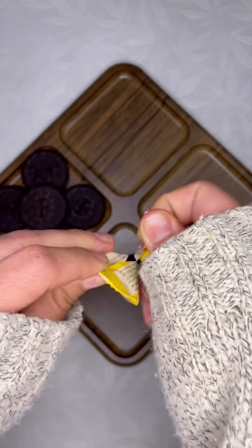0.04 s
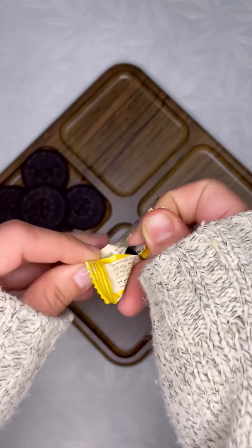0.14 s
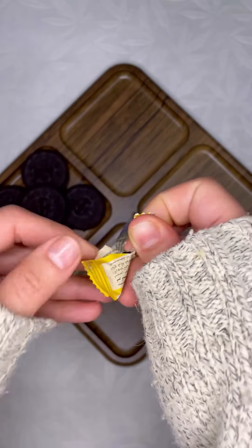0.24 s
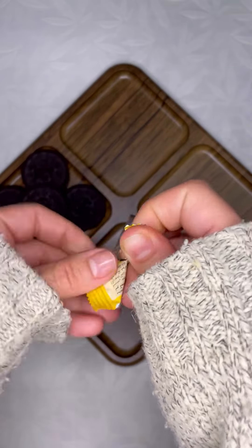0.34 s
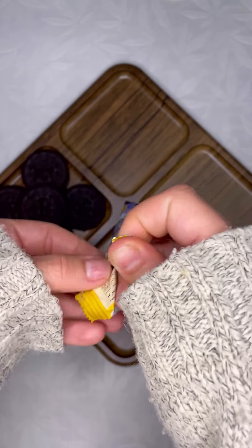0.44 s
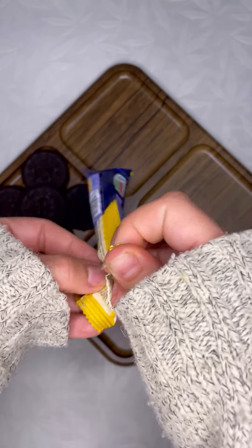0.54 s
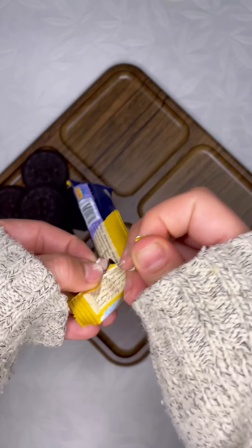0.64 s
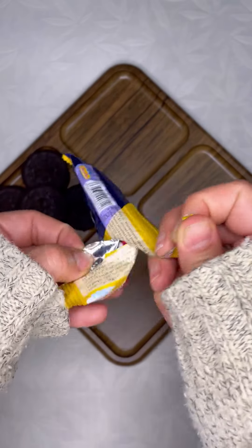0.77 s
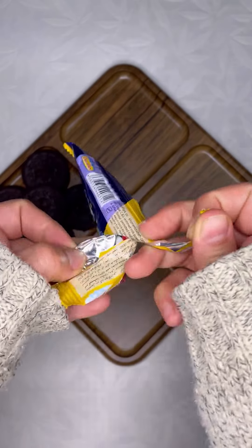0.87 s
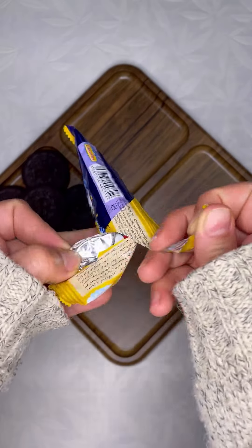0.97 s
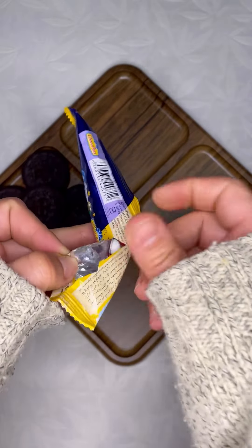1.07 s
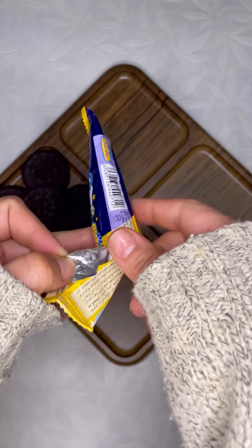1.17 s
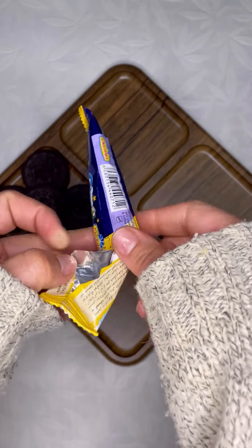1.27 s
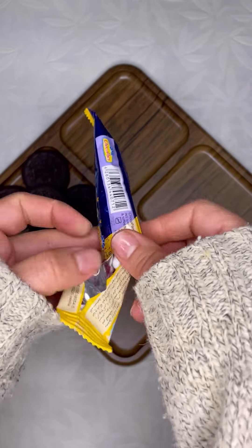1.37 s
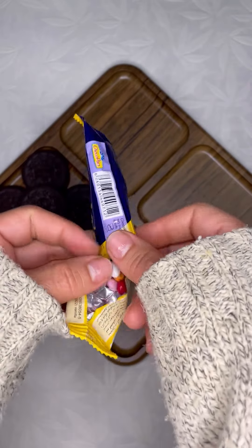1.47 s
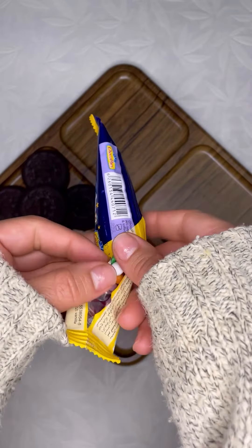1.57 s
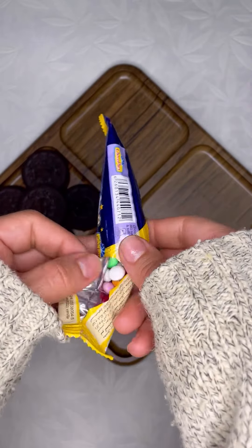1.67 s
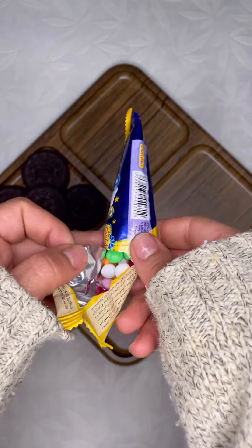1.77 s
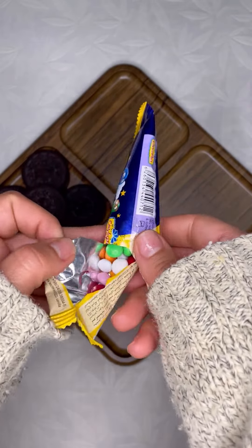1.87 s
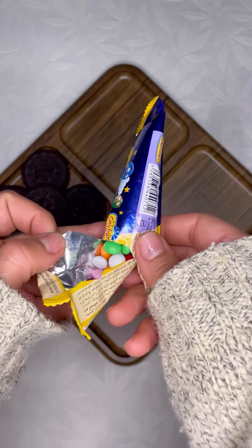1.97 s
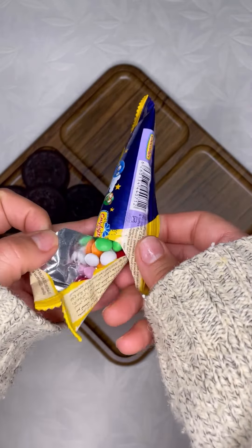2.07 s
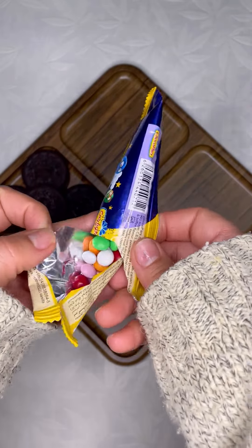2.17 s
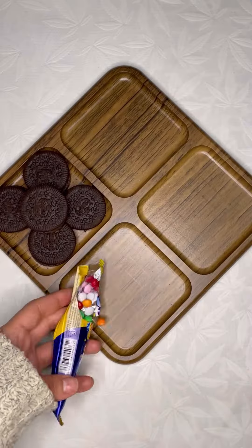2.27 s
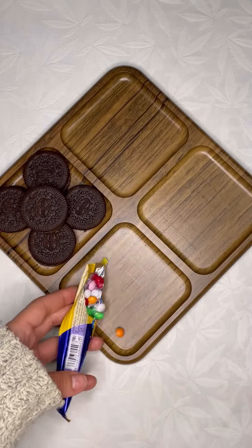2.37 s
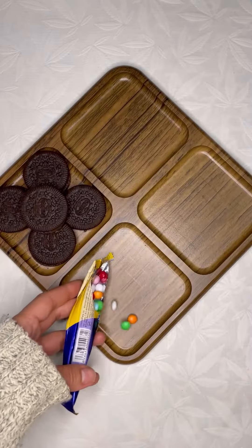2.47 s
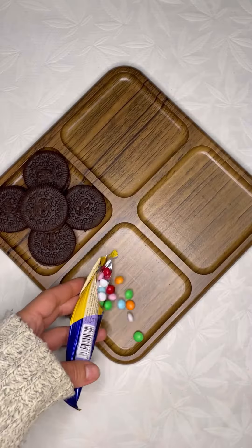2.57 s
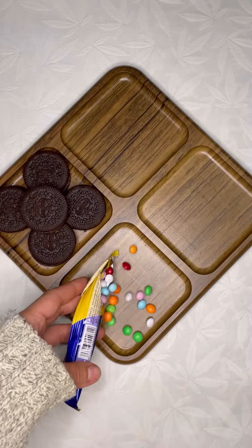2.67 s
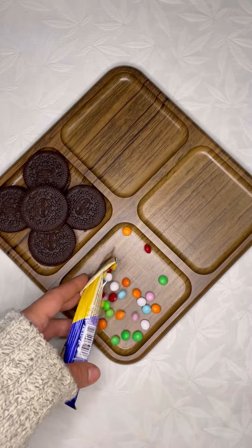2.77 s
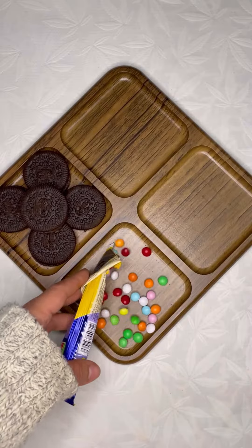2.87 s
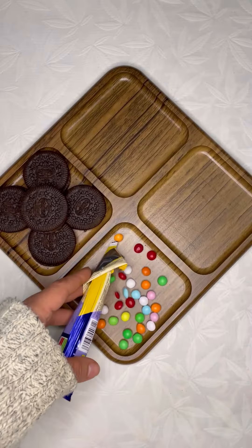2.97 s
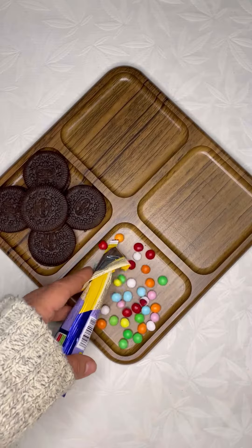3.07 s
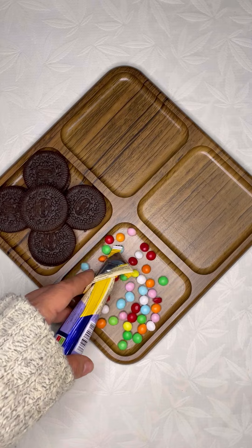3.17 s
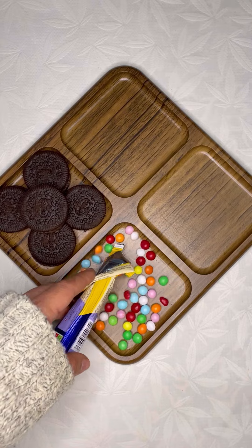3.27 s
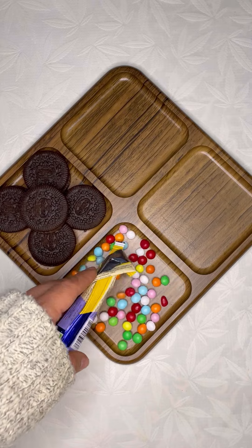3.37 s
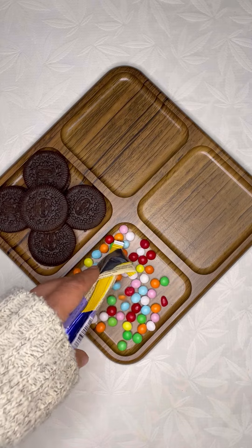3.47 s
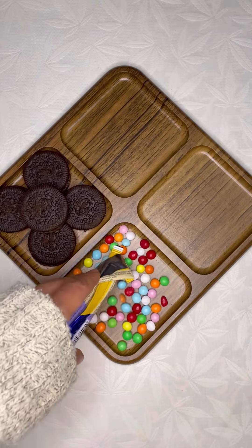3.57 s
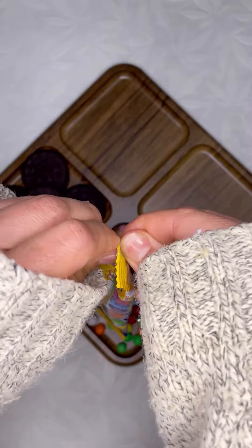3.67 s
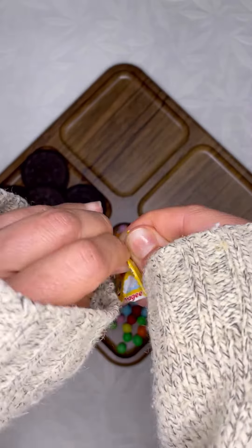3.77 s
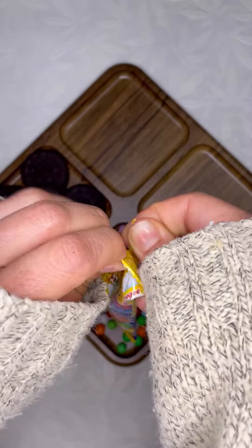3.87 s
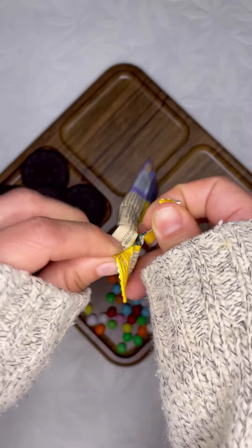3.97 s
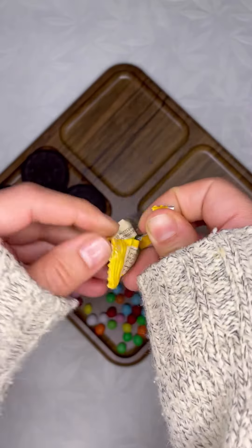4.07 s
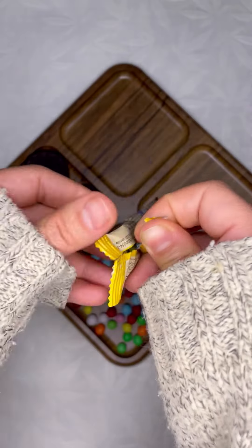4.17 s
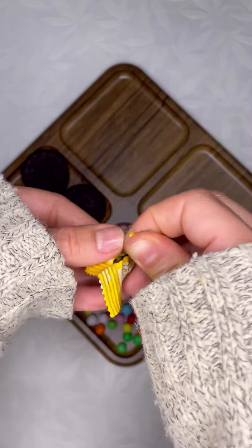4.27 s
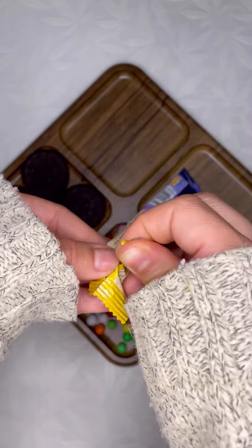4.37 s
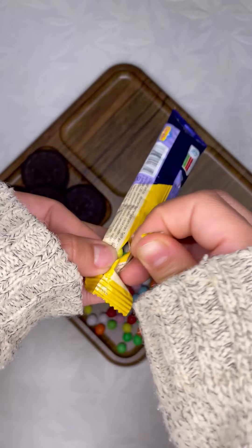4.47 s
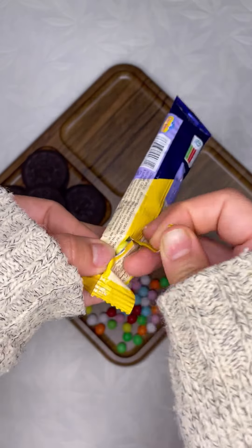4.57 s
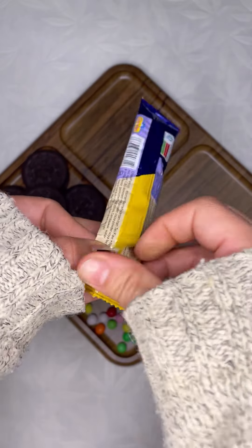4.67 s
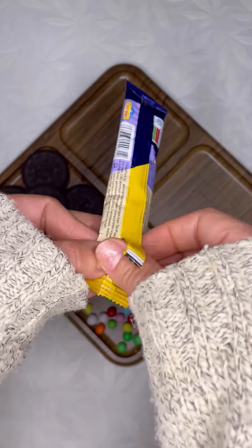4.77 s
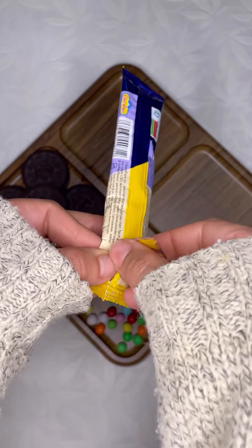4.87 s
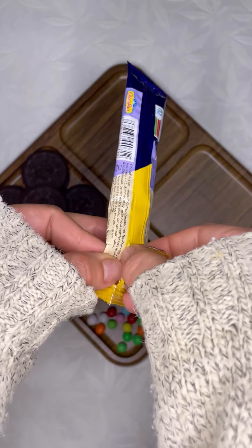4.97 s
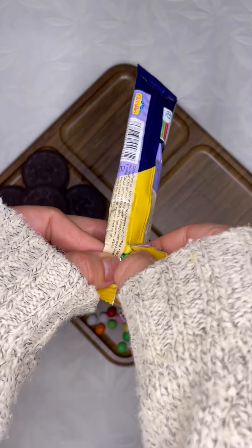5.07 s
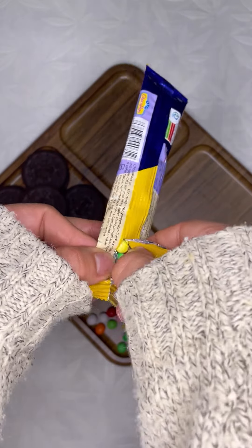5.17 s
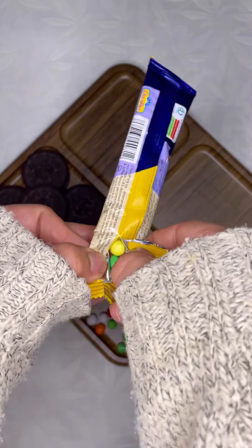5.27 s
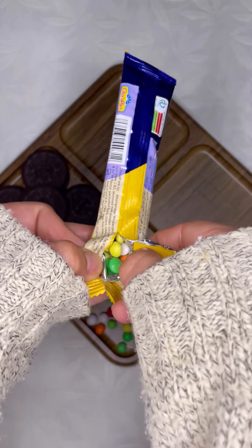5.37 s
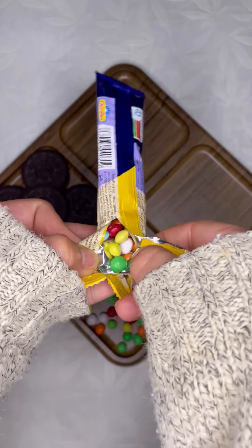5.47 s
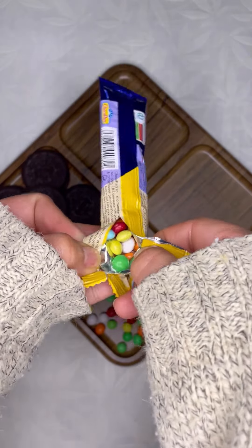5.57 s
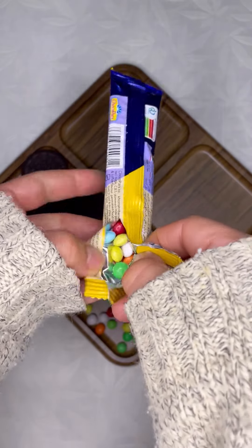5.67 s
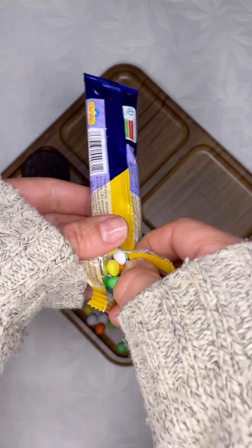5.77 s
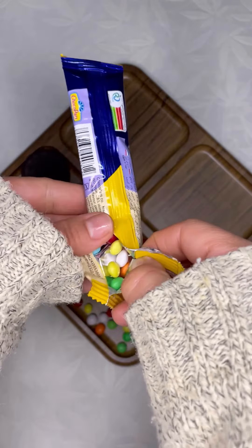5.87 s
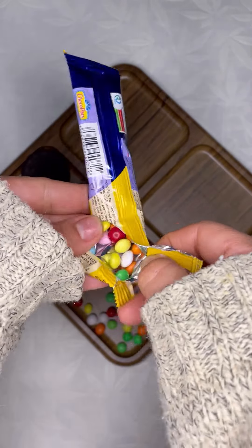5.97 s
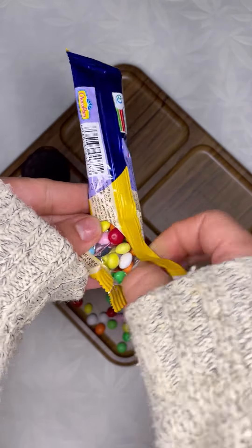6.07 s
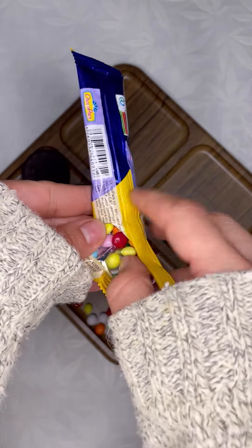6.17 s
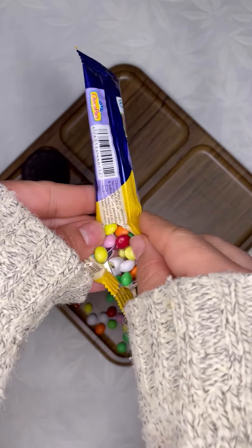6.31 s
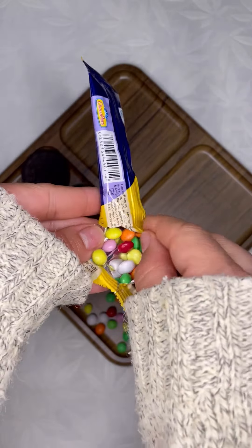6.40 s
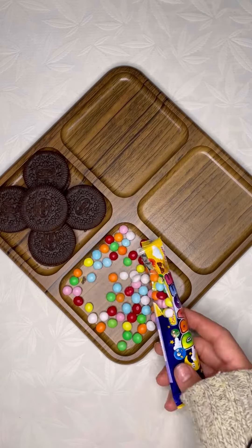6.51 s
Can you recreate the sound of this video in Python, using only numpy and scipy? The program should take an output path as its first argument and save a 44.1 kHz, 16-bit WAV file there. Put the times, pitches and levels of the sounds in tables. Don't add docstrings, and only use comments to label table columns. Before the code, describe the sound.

Close, dry phone pickup in a quiet indoor room with faint low rumble and drifting motor hum. From 0 to 2.25 s fingers tear a foil sweet packet: sharp irregular snaps, tiny ticks and short rips over fine rustling, strongest around 0.75 s, then looser crinkles as the mouth is spread. The sound cuts abruptly at about 2.26 s. A first bead clicks at 2.3 s, a trickle begins near 2.43 s, and by 2.65 to 3.4 s hard sugar-coated sweets rattle densely on a wooden tray, bright and woody, thinning to scattered ticks by 3.63 s. Another cut at 3.65 s brings the second packet: busy crisp crackling and rips until about 4.5 s, separate strong snaps near 4.8 and 5.1 s, then lighter folding, with a dull rustling swell around 6.1 s. After a final cut at 6.48 s, one bead clicks at 6.53 s.

```python
import sys
import numpy as np
from scipy import signal
from scipy.fft import rfft, irfft
from scipy.io import wavfile

SR = 44100
rng = np.random.default_rng(int(sys.argv[2]) if len(sys.argv) > 2 else 0)


def wav_out(sig):
    wavfile.write(sys.argv[1], SR, np.round(np.clip(np.atleast_2d(sig).T, -1, 1) * 32767).astype(np.int16))


def voltage_ratio(level):
    return 10 ** (np.asarray(level, float) / 20)


N = 288414
GRAIN, LEAD = 2048, 64

# t/s, energy level/dB, ring f/Hz, relative low-part level/dB
TEAR_SNAPS = [(0.0044, -14, 3270, -45), (0.0078, -10, 6270, -6), (0.0773, -20, 1890, 27),
              (0.0815, -14.5, 7350, -35), (0.1177, -18, 9600, -44), (0.1478, -6, 10200, -83),
              (0.2146, -8, 15700, -33), (0.226, -11.5, 6960, -27), (0.3037, -18, 12000, -21),
              (0.3415, -7, 9600, -23), (0.3445, -16, 3400, -28), (0.3497, -14, 9550, -16),
              (0.3552, -8.5, 3470, -19), (0.3826, -19, 2900, -16), (0.4358, -27.5, 2860, -14),
              (0.4697, -17.5, 13100, -44), (0.5368, -13, 9500, -12.5), (0.6173, -11, 11500, -26),
              (0.6364, -21, 5800, 2), (0.66, -15, 6540, -46), (0.673, -8, 9300, -25),
              (0.6865, -8, 9500, -14), (0.6967, -9.5, 7640, -48), (0.706, -12.5, 9600, -8),
              (0.7108, -22, 9400, 5), (0.7496, -13, 5460, -7), (0.7714, 5, 14500, -22),
              (0.7797, -3, 7340, -16), (0.7858, -5, 5200, -19.5)]
# t/s, energy level/dB, ring f/Hz, relative low-part level/dB
SPREAD_SNAPS = [(0.881, -28, 5230, -12), (0.949, -20, 14500, -20), (0.9578, -13.5, 2480, -5),
                (1.0135, -21.5, 3150, -18), (1.0895, -15, 2730, -8), (1.0957, -13.5, 9250, -7),
                (1.1132, -21, 14800, -8), (1.1431, -9, 8600, -7), (1.1724, -16, 4050, -11),
                (1.1757, -13, 4230, -3), (1.2077, -24.5, 1900, 8), (1.222, -11.5, 3860, -20),
                (1.2978, -11, 12500, -19), (1.3547, -16, 6200, -9), (1.3597, -7, 7140, -20),
                (1.4513, -16, 13900, -22), (1.4968, -13, 1680, 4), (1.52, -8.5, 8250, -14),
                (1.546, -21, 8500, -7), (1.5961, -12.5, 3470, -18), (1.6022, -12.5, 5650, -15),
                (1.7597, -18, 1970, -18), (1.777, -15, 12600, -9), (1.8144, -19.5, 11900, -9),
                (1.823, -18, 5540, -5), (1.827, -12.5, 5950, -19), (1.9008, -21, 4150, -17),
                (1.9474, -18.5, 6400, 1.5), (2.0536, -8.5, 8800, -23), (2.1508, -17, 5170, -9)]
# t/s, energy level/dB, ring f/Hz, relative low-part level/dB
RETEAR_SNAPS = [(3.6757, -19.5, 3300, -30), (3.7501, -10, 8900, -17), (3.794, -13.5, 2800, -17),
                (3.838, -4, 14100, -27), (3.8719, -11, 9900, -13), (3.877, -17, 10000, -36),
                (3.889, -16, 8350, -30), (3.9302, -8.5, 14500, -23), (3.9384, -10.5, 12300, -18),
                (3.9519, -12, 7850, -11), (3.958, -17, 3070, -27), (3.9848, -13, 11100, -17),
                (4.055, -23, 3360, -6), (4.062, -15, 10000, -10), (4.065, -14, 6900, -20),
                (4.0754, -9.5, 2900, -7), (4.098, -10.5, 9600, -36), (4.1072, -16, 3650, -52),
                (4.174, -21.5, 5460, -28), (4.2524, -13, 9200, -29), (4.264, -13.5, 3850, -72),
                (4.279, -17.5, 13000, -39), (4.3277, -14, 14800, -36), (4.3607, -19, 8100, -41),
                (4.379, -5, 16800, -39), (4.427, -18, 13900, -35), (4.441, -9.5, 13500, -35),
                (4.4459, -7.5, 7400, -39), (4.4545, -14, 4140, -10)]
# t/s, energy level/dB, ring f/Hz, relative low-part level/dB
PULL_SNAPS = [(4.6181, -19, 7200, -9), (4.621, -19.5, 7300, 4), (4.6344, -13, 7800, -22),
              (4.644, -19, 6800, 0), (4.648, -13.5, 3360, -24), (4.6531, -15, 5470, -11),
              (4.7009, -14.5, 8100, -15), (4.7345, -16, 8900, -10), (4.7624, -15, 6850, -4),
              (4.7992, -1.5, 7800, -30), (5.011, -20, 7300, -26), (5.0365, -24.5, 3740, -7),
              (5.055, -28, 2900, -3), (5.1056, 1.5, 8340, -98), (5.112, -13, 9600, -45),
              (5.1369, -8.5, 12500, -37), (5.255, -12.5, 12500, -27.5), (5.2719, -24, 8950, -28),
              (5.317, -31, 15100, -28), (5.409, -8.5, 8500, -13), (5.438, -6.5, 13900, -21),
              (5.4525, -8.5, 14500, -13)]
# t/s, energy level/dB, ring f/Hz, relative low-part level/dB
FOLD_SNAPS = [(5.5192, -30, 6870, -44), (5.5723, -14.5, 3940, -15.5), (5.613, -23, 4050, -1),
              (5.7007, -30, 2020, -11), (5.7124, -11, 11600, -25), (5.734, -13, 12200, -60),
              (5.809, -23, 7400, -5), (5.8766, -17.5, 3620, -56), (5.9176, -8, 14200, -27),
              (5.9866, -6, 6040, -21), (5.957, -29, 9650, -38), (5.996, -23, 10000, -29),
              (6.012, -33, 3000, 4), (6.0483, -15, 10200, -14), (6.101, -7.5, 13800, -18),
              (6.116, -16.5, 1800, 22), (6.1204, -18, 10300, -3), (6.176, -27, 9600, -10),
              (6.185, -28, 7100, -4), (6.224, -25, 7900, -4), (6.257, -16.5, 13100, -25),
              (6.331, -19, 13000, -55), (6.3564, -19, 7160, -10), (6.3668, -15.5, 12900, -36),
              (6.3785, -14.5, 3420, -12.5), ]
SNAPS = np.vstack([TEAR_SNAPS, SPREAD_SNAPS, RETEAR_SNAPS, PULL_SNAPS, FOLD_SNAPS])
# t/s, energy level/dB, ring f/Hz
LIGHT_CREASES = [(0.0442, -30, 3020), (0.0467, -19, 2900), (0.4017, -22, 3100), (0.5019, -23, 6550),
                 (0.5236, -24, 3900), (0.5544, -22, 6400), (0.7134, -19, 9000), (0.7214, -23, 2700),
                 (0.767, -22, 2000), (0.8478, -26, 6900), (0.8914, -20, 2380), (0.9386, -25, 6900),
                 (0.9409, -20, 5900), (1.0167, -24, 9000), (1.028, -21, 6600), (1.051, -23.5, 8300),
                 (1.1973, -21, 3500), (1.211, -23, 5100), (1.4882, -13.5, 13300), (1.5547, -23.5, 3100),
                 (1.7538, -18.5, 3580), (1.951, -25, 1480), (1.959, -23, 1600), (2.0123, -23, 3700),
                 (2.0374, -24, 2700), (3.7134, -31, 2480), (3.761, -20, 3400), (3.7985, -22, 10200),
                 (3.9118, -23, 5000), (3.9325, -14, 4470), (3.9554, -15, 7900), (3.9886, -23, 6000),
                 (4.039, -21.5, 3340), (4.0793, -22, 12400), (4.085, -12, 7140), (4.1251, -25, 3500),
                 (4.1709, -21.5, 10100), (4.2322, -21, 4280), (4.3218, -26.5, 3650), (4.343, -24, 4700),
                 (4.385, -18, 8600), (4.404, -21, 3700), (4.489, -27.5, 3700), (4.5278, -20.5, 10300),
                 (4.614, -20, 7040), (4.7026, -23, 9900), (5.0221, -22, 14400), (5.0648, -27.5, 3200),
                 (5.2754, -24, 9300), (5.3442, -24.5, 11800), (5.4032, -25, 7800), (5.4166, -7.5, 9000),
                 (5.43, -14, 6500), (6.2906, -22.5, 13900), (6.4501, -28.5, 3540)]
# t/s, energy level/dB, ring f/Hz
FURTHER_TICKS = [(0.0994, -37, 4700.0), (0.2287, -19, 9200.0), (0.2537, -28, 4300.0),
                 (0.3324, -30, 3200.0), (0.5271, -25, 6500.0), (0.6882, -18, 9100.0),
                 (0.7585, -17, 12700.0), (0.7628, -20, 6200.0), (1.2784, -27, 12400.0),
                 (1.3443, -19, 7300.0), (1.4059, -28, 2940), (1.5114, -22, 12600.0),
                 (1.5174, -23.0, 8800.0), (1.5745, -25, 13300.0), (1.6741, -25.5, 3700.0),
                 (1.7102, -27, 11300.0), (1.7462, -31, 3100.0), (3.7525, -21, 8360),
                 (3.7706, -26.0, 3600.0), (3.9472, -20.0, 10200.0), (3.9765, -40, 1700.0),
                 (4.2727, -27.0, 7700.0), (4.5464, -24, 13400.0), (4.6294, -24, 3200.0),
                 (4.7713, -26, 7400.0), (4.7837, -28, 12700.0), (5.2618, -21, 6000.0),
                 (6.2298, -29, 2300.0)]


def foil():
    s, db, hz, low_db = np.transpose(SNAPS)
    clear = place(s, voltage_ratio(db + 1.5)[:, None] * snaps(hz, low_db))
    s, db, hz = np.transpose(np.vstack([LIGHT_CREASES, FURTHER_TICKS]))
    light = place(s, voltage_ratio(db)[:, None] * snaps(hz, np.full(len(s), -22.0), size=512))
    return clear + light + rips() + thumps() + rubbing()


# f/Hz, level/dB (per Hz)
FOIL_SPECTRUM = [(180, -69), (300, -10), (685, -16), (3070, -0.5), (5730, -4.5), (7380, -0.5),
                 (11300, -2.5), (15200, -0.5), (16900, -0.5)]


def snaps(hz, low_db, size=GRAIN):
    f = np.fft.rfftfreq(size, 1 / SR)
    hz, low_db = hz[:, None], low_db[:, None]
    ring = 1 / (1 + ((f - hz) / (0.14 * hz)) ** 2)
    broad = 1.17 * voltage_ratio(0.33 * (low_db + 8)) * colour(f, FOIL_SPECTRUM) / (1 + (f / (2.3 * hz)) ** 2)
    low_cut = f ** 2 / (f ** 2 + np.minimum(3500.0, hz) ** 2)
    crack = unit((ring + broad) * low_cut)
    bump = np.exp(-(np.log(np.maximum(f, 1) / 1600) / 0.76) ** 2)
    low = voltage_ratio(low_db - 4.5) * unit(bump)
    strikes = burst(len(hz), t60=0.0037, tail_db=-27.5, tail_t60=0.043, strike=3.47, size=size)
    return unit(irfft(rfft(strikes) * (crack + low)))


# t/s, duration/s, energy level/dB, ring f/Hz
RIPS = [
    (0.233, 0.0052, -16, 9000),
    (0.746, 0.0095, -16, 5000),
    (1.084, 0.0085, -12.5, 10000),
    (3.943, 0.011, -14, 9000),
    (4.0895, 0.0077, -10.5, 9050),
    (6.083, 0.0055, -20.5, 5000),
]


def rips():
    s, length, db, hz = np.transpose(RIPS)[:, :, None]
    count = 24
    chance = rng.random(size=(len(RIPS), 2, count))
    pitch = np.minimum(hz * 4.4 ** (chance[:, 1] - 0.5), 16000).ravel()
    weight = np.repeat(voltage_ratio(db) / np.sqrt(count), count, axis=0)
    grains = weight * snaps(pitch, np.full(len(pitch), -14.0), size=512)
    return place((s + length * chance[:, 0] ** 1.2).ravel(), grains)


# t/s, peak level/dB, f/Hz
KNOCKS = [
    (.004, -36.5, 464),
    (0.3487, -37, 462),
    (.538, -42, 1100),
    (1.496, -48, 496),
    (6.116, -43, 325),
]


def thumps():
    s, db, hz = np.transpose(KNOCKS)
    t = np.arange(512) / SR
    return place(s, voltage_ratio(db)[:, None] * np.sin(2 * np.pi * hz[:, None] * t) * np.exp(-t / 0.0026))


# t/s, level/dB
GRIP = [(0.0, -50.5), (0.37, -56.5), (0.61, -57.5), (0.73, -55.5), (1.24, -56.5), (1.68, -52),
        (2.04, -63.5), (2.27, -55), (2.36, -58.5),
        (3.68, -68), (3.84, -56.5), (3.96, -52.5), (4.14, -61.5), (4.61, -56), (4.83, -62.5),
        (5.78, -61), (6.14, -55), (6.5, -61.5)]
PALM_S, PALM_LENGTH_S, PALM_DB = 6.07, 0.12, 5
DULL_DB, DULL_PER_DB = 33, 0.5009


def rubbing():
    f, t = np.fft.rfftfreq(N, 1 / SR), np.arange(N) / SR
    hiss = irfft(rfft(rng.standard_normal(N)) * colour(f, FOIL_SPECTRUM), N)
    sparse = crackle(rng.random(size=330) * N / SR, 0, spread_db=5.5)
    dense = crackle(rng.random(size=5000) * N / SR, 0, spread_db=4.5)
    both = voltage_ratio(-3.0) * rms1(dense) + voltage_ratio(-7.0) * rms1(sparse) + voltage_ratio(-7.5) * rms1(hiss)
    dull = irfft(rfft(both) / (1 + (f / 5000) ** 4), N)
    grip_db = curve(GRIP)
    tilt = voltage_ratio((DULL_DB + DULL_PER_DB * grip_db) / 2)
    palm = voltage_ratio(PALM_DB * np.exp(-((t - PALM_S) / PALM_LENGTH_S) ** 2))
    held = (t < CUTS_S[0] + 0.14) | (t > CUTS_S[1])
    return held * voltage_ratio(grip_db + work()) * (dull * tilt * palm + (both - dull) / tilt)


def crackle(s, db, spread_db=8.5):
    chance = rng.random((len(s), 2)).T
    tiny = snaps(2500 * 7.2 ** chance[0], np.full(len(s), -14.0), size=512)
    return place(s, tiny * voltage_ratio(db - spread_db * np.log(1 - 0.97 * chance[1]))[:, None])


WORK_S, WORK_DB, REST, WORK_BEFORE = 0.011, 14, 0.44, 0.25


def work():
    hop = 64
    late = np.arange(0, N, hop)[:, None] / SR - np.transpose(SNAPS)[0]
    near = (np.exp(-np.abs(late) / WORK_S) * np.where(late > 0, 1, WORK_BEFORE)).sum(axis=1)
    return np.repeat(WORK_DB * np.log10(REST + near), hop)[:N]


# t/s, energy level/dB, treble-over-middle level/dB
FIRST_BEADS = [(2.3079, -3.5, -6.0), (2.4281, -2.5, -15), (2.4379, -4.5, -12), (2.4588, -10, 10),
               (2.4788, -6.5, -8), (2.4821, -5.5, -17), (2.5157, -9, -6), (2.5347, -9, -2),
               (2.5454, -4.5, -12), (2.5543, -4, -7), (2.5736, -2, -10), (2.5811, -5, -13),
               (2.5995, -11, -8), (2.6049, -3, 5), (2.6124, -9, -4), (2.615, -3, 8), (2.6224, -1, -11),
               (2.6423, -1, -1.0), (2.6519, -5.5, -12), (2.6642, -16, -9.0), (2.6757, -3, -6),
               (2.695, -5.0, -1.0), (2.6975, -5, 0), (2.7005, -6, -6), (2.7082, -9, -7), (2.7175, -6, -4),
               (2.726, -5, 8), (2.744, 0, -9), (2.7562, -4, -10), (2.7703, -8.0, -5.0), (2.7856, -4.5, -5),
               (2.7945, 1, -8), (2.8114, -10, -8), (2.8205, -5, -6), (2.8247, -9, -5), (2.8287, -1, -15),
               (2.8318, -7.5, -10), (2.8446, -6, -4), (2.856, -2.5, -2), (2.8602, -6, -13),
               (2.8661, -6.5, -2), (2.8702, -4.5, -1)]
# t/s, energy level/dB, treble-over-middle level/dB
STREAM_BEADS = [(2.8747, 0, -6), (2.8933, -4, -1), (2.911, -1, 12), (2.9254, -4, 1), (2.932, -4, -11),
                (2.936, -8, -3.0), (2.9398, -2, -5), (2.9465, -10, 5), (2.9488, 3.5, 9), (2.9549, -12, -2),
                (2.9577, 0.0, 2.0), (2.9666, -12, -5), (2.97, -6.5, -10), (2.9801, 1, 4), (2.9849, -3, 3.0),
                (2.9887, -2.5, 2), (2.9992, -17, 3), (3.002, -13, -5.0), (3.008, -8, -6),
                (3.0197, -14, -10.0), (3.0239, 2, 3), (3.0282, -8, -5), (3.036, -8.5, -2), (3.0397, -4, 6),
                (3.0421, -1, -4), (3.0501, -2.0, 1), (3.0679, -5, -11), (3.0718, 0.5, -6),
                (3.0867, -5.0, -7.0), (3.0933, 0.5, -12), (3.0996, -2, -3), (3.1128, -5, 0), (3.1183, 0, 3),
                (3.1252, -7, -12), (3.1292, 2, -1.0), (3.1409, -4, -9), (3.1495, -6, -2.0),
                (3.1534, 0.5, 0.0), (3.1592, -4, -3), (3.1764, -4, -14), (3.1795, 0, 5), (3.1825, -4.5, -8)]
# t/s, energy level/dB, treble-over-middle level/dB
LAST_BEADS = [(3.1871, -1, -10), (3.1991, 0.5, -10), (3.213, 2, 0.0), (3.2185, -1.5, -3), (3.2252, -10, -4),
              (3.2283, -7, -9), (3.2329, -2, 3), (3.2509, -14, 3), (3.2555, -1.5, -1), (3.26, 1.5, 1.0),
              (3.2823, 1.5, -10), (3.292, -0.5, -4), (3.3178, 5, -4), (3.3205, -5, -1), (3.3311, -12.5, 4),
              (3.3375, -1.5, 5.5), (3.3403, -6, 11), (3.3496, -5, -2), (3.3545, -3, 1), (3.3755, -18, 2.5),
              (3.3787, 9, 4.5), (3.3875, -11.0, 2), (3.3975, -13, 0), (3.4029, -7.5, -4), (3.421, -18, -1),
              (3.4384, -4.5, -6), (3.4405, -2, 3), (3.4495, -21, -6), (3.462, -17, -3), (3.4724, -12, -3.0),
              (3.4894, 1, -4), (3.5083, -7, 7), (3.5291, -7, 1), (3.5352, -14, -3), (3.5451, -5, -1),
              (3.5546, -14, -4), (3.5604, -3.5, -3), (3.5766, -10, -8), (3.5856, -8, -6), (3.5936, -9.5, 1),
              (3.5998, -17, -8), (3.6169, -7.5, 3), (3.6316, -10, -2)]
# t/s, energy level/dB, treble-over-middle level/dB
OTHER_BEADS = [
    (2.314, -14.5, -22),
    (2.358, -24.5, -43),
    (2.388, -23.5, -25),
    (2.395, -21, -16),
    (2.407, -27, -1),
    (2.419, -25, 9),
    (6.5318, 2, 8),
    (6.536, -23, -11),
]
# t/s, level/dB
POUR_FLOW = [
    (2.37, -68),
    (2.43, -52),
    (2.56, -51.5),
    (2.64, -38.5),
    (3.34, -38.5),
    (3.44, -46),
    (3.54, -45.5),
    (3.64, -47.5),
]


def beads():
    s, db, treble_db = np.transpose(np.vstack([FIRST_BEADS, STREAM_BEADS, LAST_BEADS, OTHER_BEADS]))
    landings = place(s, voltage_ratio(db - 0.44)[:, None] * drops(s, 3.0 + 0.4 * treble_db))
    chance = rng.random(size=(330, 3)).T
    s = evenly(chance[0], POUR_FLOW[0][0], POUR_FLOW[-1][0])
    size_gain = voltage_ratio(-2.8 * np.log(1 - 0.97 * chance[2]))[:, None]
    patter = place(s, drops(s, -12 + 8 * chance[1]) * size_gain)
    t = np.arange(N) / SR
    seen = (t < CUTS_S[1]) | (t > CUTS_S[2])
    return (landings + voltage_ratio(curve(POUR_FLOW) - 4.5) * rms1(patter)) * seen


# f/Hz, bandwidth/Hz, level/dB
TRAY_MODES = [(296, 56, -15), (824, 240, -12.5), (1538, 78, -7), (1954, 220, -11.5), (2700, 124, -6.5),
              (3150, 510, -3.5), (4095, 177, 3.5), (5414, 186, -1), (6640, 330, -3.5), (8350, 420, -2.5),
              (9600, 1180, 3), (11900, 1700, 2)]
WELL = 6
FILL_DB_PER_S, FULL_S = 15, 2.98
COVERED_S, COVERED_DB = 3.42, -5.5
BARE_HZ, BARE_DB_PER_S = 2900, -2


def drops(s, sharp_db, size=GRAIN):
    t = np.arange(size) / SR
    hz, width, db = np.transpose(TRAY_MODES)
    chance = rng.standard_normal((len(sharp_db), 3, len(hz)))
    sharpness = 0.47 * sharp_db[:, None] * np.log2(np.maximum(hz, 2600) / 4500)
    gain = width * voltage_ratio(db + 1.9 * chance[:, 0] + sharpness)
    gain[:, WELL] *= voltage_ratio(FILL_DB_PER_S * np.minimum(s - FULL_S, 0) + COVERED_DB * (s > COVERED_S))
    gain[:, hz < BARE_HZ] *= voltage_ratio(BARE_DB_PER_S * (np.minimum(s, CUTS_S[1]) - FULL_S))[:, None]
    ring = 0
    for k in range(len(hz)):
        detuned_hz = hz[k] * (1 + 0.014 * chance[:, 1, k, None])
        phase = 2 * np.pi * detuned_hz * t + np.pi * chance[:, 2, k, None]
        ring = ring + gain[:, k, None] * np.sin(phase) * np.exp(-np.pi * 1.45 * width[k] * t)
    ring = ring * np.minimum(t / 0.00081, 1)
    contact = burst(len(sharp_db), t60=0.0068, tail_db=-22.0, tail_t60=0.043, strike=6.2, size=size)
    hollow = 1 - 0.78 * np.exp(-((np.fft.rfftfreq(size, 1 / SR) - 480) / 110) ** 2)
    body = unit(irfft(rfft(ring) * rfft(contact) * hollow))
    tick = unit(np.diff(contact, prepend=0) * np.exp(-t / 0.006))
    return unit(body + voltage_ratio(sharp_db[:, None] - 7.5) * tick)


# f/Hz, level/dB (per Hz)
AIR_SPECTRUM = [(12, -39), (20, 11.5), (90, -2), (140, -6), (210, -10.5), (315, -16), (778, -26),
                (1800, -31), (5000, -50)]
# f/Hz, bandwidth/Hz, level/dB
ROOM_MODES = [(79.4, 5.1, 0.5), (188.6, 5.9, 2), (230.6, 5.1, 5)]


def room():
    f = np.fft.rfftfreq(N, 1 / SR)
    boom = 1 + sum(voltage_ratio(db) / (1 + ((f - hz) / width) ** 2) for hz, width, db in ROOM_MODES)
    rumble = irfft(rfft(rng.standard_normal(N)) * colour(f, AIR_SPECTRUM) * boom, N)
    return voltage_ratio(-54.5) * rms1(rumble) + voltage_ratio(-102.5) * rng.standard_normal(N)


# f/Hz, level/dB, start t/s, end t/s
MOTORS = [
    (75.7, -64, -0.5, 6.6),
    (122, -67, -0.5, 3.5),
    (182, -67.5, 1, 2.1),
    (94.4, -64, 4.5, 6.48),
    (194.6, -72, 5, 7.2),
]


def hum():
    t, out = np.arange(N) / SR, 0
    for hz, db, start, end in MOTORS:
        knots = np.linspace(0, t[-1], num=25)
        drift, swell = (np.interp(t, knots, c) for c in rng.standard_normal(size=(2, 25)))
        phase = 2 * np.pi * np.cumsum(hz * (1 + 0.01174 * drift)) / SR
        tone = np.sqrt(2) * voltage_ratio(db + 1.9 * swell) * np.sin(phase)
        out = out + tone * (t >= start) * (t < end)
    return out


def burst(count, t60, tail_db, tail_t60, strike, size=GRAIN):
    t = np.arange(size) / SR
    fall = voltage_ratio(-60 * t / t60) + voltage_ratio(tail_db - 60 * t / tail_t60)
    return rng.standard_normal((count, size)) * fall + strike * (t == 0)


def place(s, grains):
    out = np.zeros(N + GRAIN)
    start = np.clip(s * SR, 0, N).astype(int)
    np.add.at(out, start[:, None] + np.arange(grains.shape[1]), np.roll(grains, LEAD, axis=1))
    return out[LEAD:N + LEAD]


def evenly(chance, start_s, end_s):
    return start_s + (np.arange(len(chance)) + chance) / len(chance) * (end_s - start_s)


def curve(table):
    s, db = np.transpose(table)
    return np.interp(np.arange(N) / SR, s, db)


def colour(hz, points):
    f, db = np.transpose(points)
    return voltage_ratio(np.interp(np.log(np.maximum(hz, 1)), np.log(f), db))


def unit(x):
    return x / np.sqrt(np.sum(x ** 2, axis=-1, keepdims=True))


def rms1(x):
    return x / np.sqrt(np.mean(x ** 2))


CUTS_S = [
    2.256,
    3.647,
    6.477,
]


def scene():
    t = np.arange(N) / SR
    fade = np.prod([np.where(t < s, 1, np.clip((t - s) / 0.062, 0.02, 1)) for s in CUTS_S], axis=0)
    return ((foil() + beads() + room() + hum()) * fade)[None]


def roll_off(x):
    return signal.sosfilt(signal.butter(12, 17020, fs=SR, output="sos"), x)


def record(dry):
    low_pass = signal.ellip(8, 0.2, 60, 16000, fs=SR, output="sos")
    mix = signal.sosfilt(low_pass, dry)
    return roll_off(mix)


dry = scene()
out = record(dry)
wav_out(out)
```